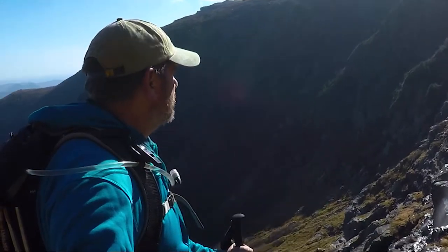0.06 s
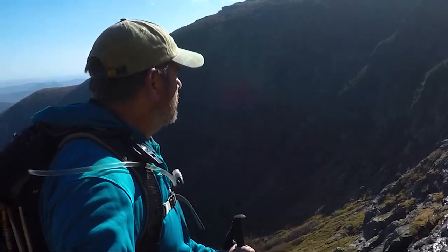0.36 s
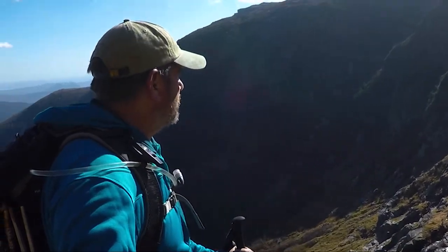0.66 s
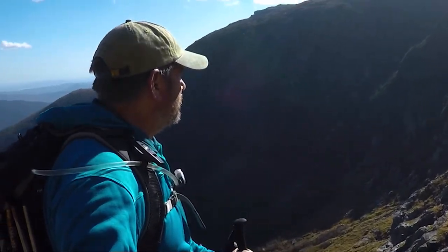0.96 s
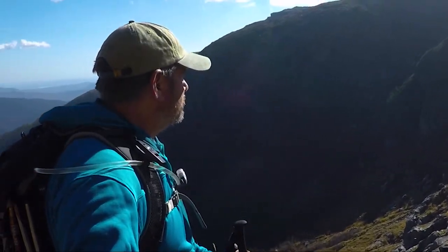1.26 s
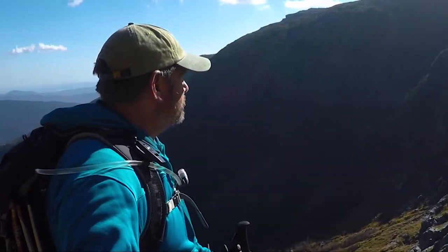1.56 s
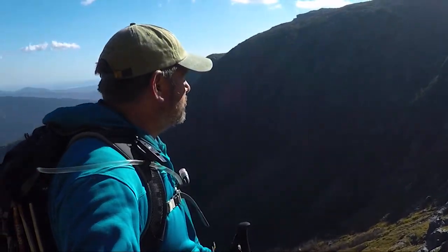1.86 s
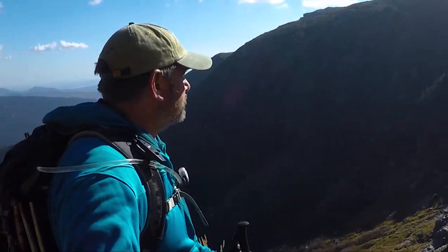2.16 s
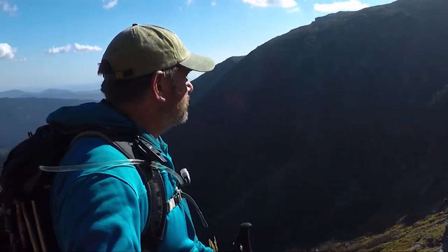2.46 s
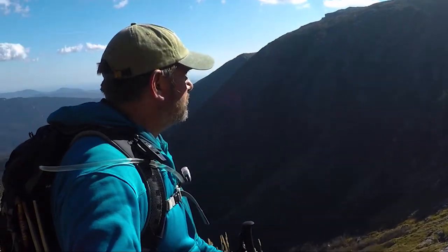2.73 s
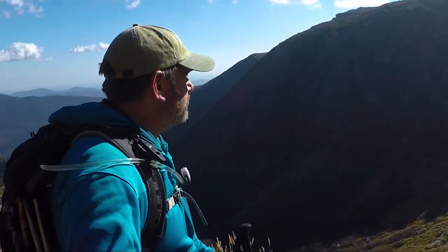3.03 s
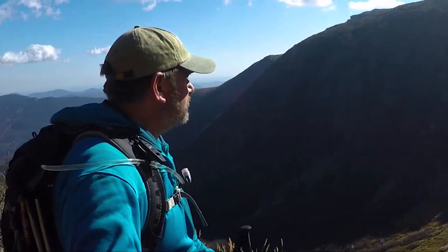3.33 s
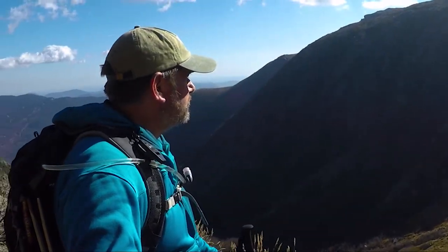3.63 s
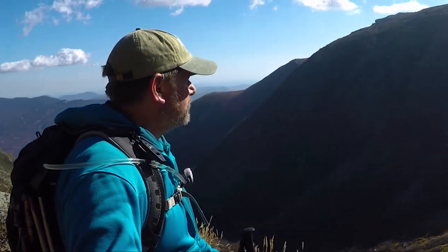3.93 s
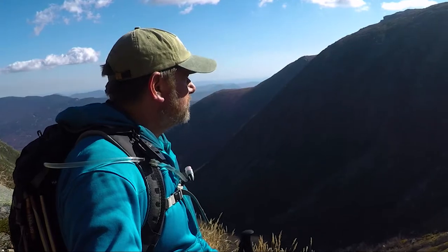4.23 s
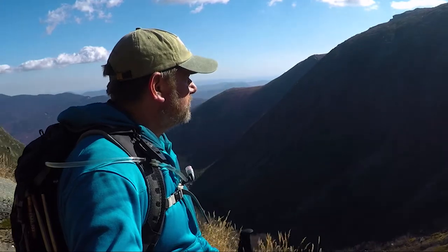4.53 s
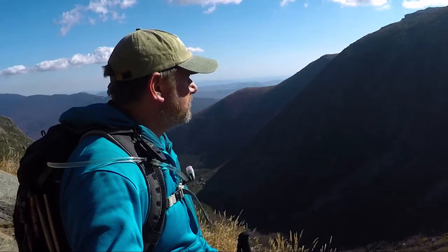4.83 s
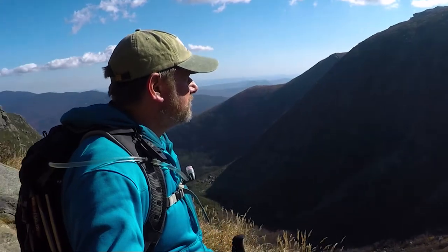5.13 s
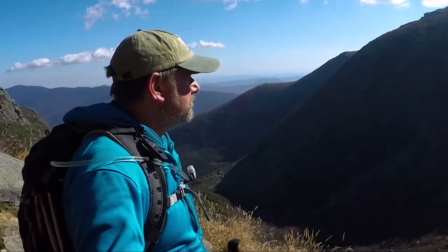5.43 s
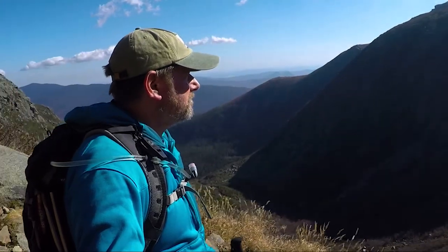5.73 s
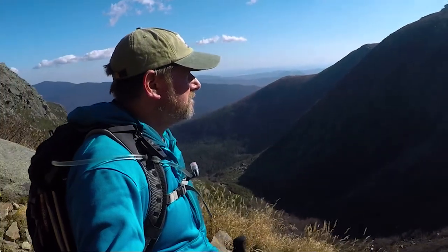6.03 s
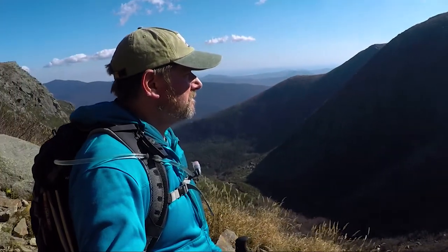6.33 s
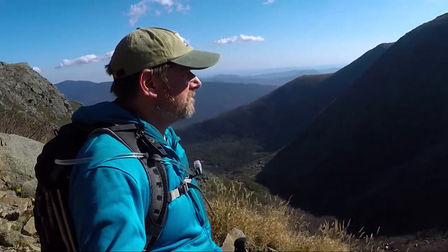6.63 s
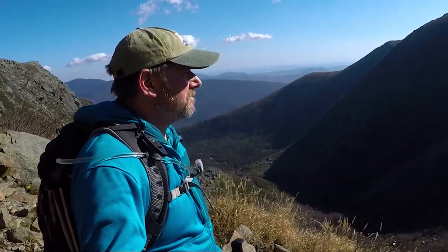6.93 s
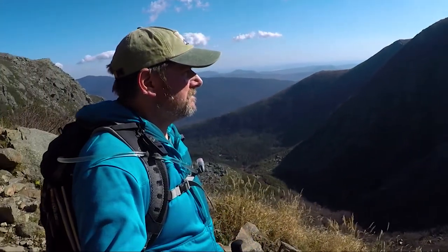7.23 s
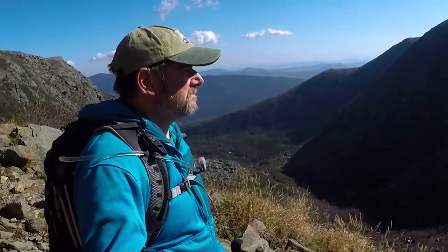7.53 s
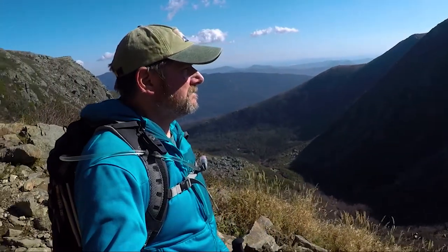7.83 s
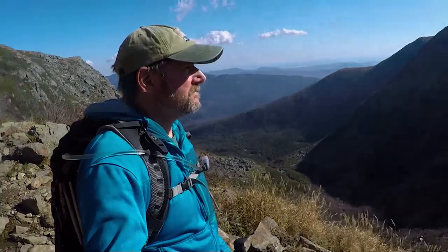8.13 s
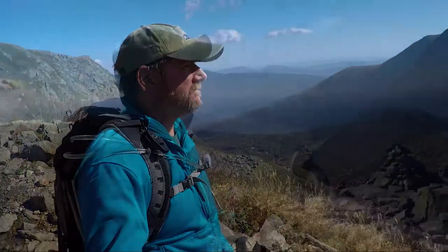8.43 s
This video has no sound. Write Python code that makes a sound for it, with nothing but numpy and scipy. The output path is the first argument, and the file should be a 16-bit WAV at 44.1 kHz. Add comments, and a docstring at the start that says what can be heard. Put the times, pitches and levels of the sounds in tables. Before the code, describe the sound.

Deep, uneven wind rumble buffets the microphone outdoors on a mountainside, each gust swelling fast and dying away, some with a dull thump. A quiet, continuous trickle of water runs underneath, along with a few light taps and the thin hiss of dry grass. After a lull just past the middle, the gusts return, and the grass rustles once as its stalks click together.

```python
"""You hear gusts of wind rumbling and fluttering on an open mountain slope.
Each gust swells fast, holds and dies away as swirls of air (eddies) push on the microphone.
Behind it is the steady wash of running water, with small bubbles gurgling near by.
Dry grass hisses in the breeze and rustles up once; its stalks tick against each other,
and there are a few soft dry taps."""
import sys
import numpy as np
from scipy import signal
from scipy.fft import rfft, irfft, next_fast_len
from scipy.io import wavfile
from scipy.ndimage import uniform_filter1d

SR = 44100
rng = np.random.default_rng(int(sys.argv[2]) if len(sys.argv) > 2 else 0)


def store_wav(level_fs):
    """Save 16-bit WAV to argv[1]."""
    pcm = np.round(np.clip(np.atleast_2d(level_fs), -1, 1) * 32767)
    wavfile.write(sys.argv[1], SR, pcm.T.astype(np.int16))


N = 378283
TIME = np.arange(N) / SR

# how strongly the breeze stirs the grass: (time [s], stirring [dB])
GRASS_STIRRING = [(0.0, -46), (2.2, -48.5), (3.1, -46.5), (5.15, -45), (5.35, -47.5), (6.2, -46.5),
                  (6.58, -45), (6.72, -42.5), (7.02, -46), (8.58, -48.5)]
CALM_GRASS_DB = -47  # the stirring in a light breeze


def amp(db):
    """Turns decibels into a number to multiply a sound by."""
    return 10 ** (np.asarray(db) / 20)


def unit_level(x):
    """Scales a signal so that its average level (rms) is one."""
    return x / np.sqrt(np.mean(x ** 2) + 1e-20)


def follow(curve):
    """Joins (time, value) points with straight lines, giving a value for every sample."""
    times, values = np.transpose(curve)
    return np.interp(TIME, times, values)


def colour(x, spectrum):
    """Shapes the bass and treble by (frequency, level) points; the result has a level of one."""
    size = next_fast_len(N)
    points_hz, points_db = np.transpose(spectrum)
    hz = np.fft.rfftfreq(size, 1 / SR)
    gain = amp(np.interp(np.log(hz + 1), np.log(points_hz), points_db))
    return unit_level(irfft(rfft(x, size) * gain, size)[:N])


def wander(per_s):
    """A random curve of level one that heads for a new value per_s times a second."""
    return unit_level(np.interp(TIME * per_s, np.arange(N), rng.standard_normal(N)))


def add(mix, start_s, sound):
    """Adds a sound into the mix at the given time."""
    part = mix[max(round(start_s * SR), 0):][:len(sound)]
    part += sound[:len(part)]


def bubble(hz, rise_s, glide):
    """A bubble swells into its ring and dies; its pitch creeps up as it nears the surface."""
    age = np.arange(int(9 * rise_s * SR)) / (rise_s * SR)  # counted in rise times
    pitch = hz * (1 + glide * (age - 2))
    return age * np.exp(1 - age) * np.sin(2 * np.pi * np.cumsum(pitch) / SR)


def gurgle(centre_hz, octaves, peak_db, spread_db, rise_s, count):
    """Many small bubbles ring at random moments, their pitches spread around a centre."""
    out = np.zeros(N)
    for when, pitch, faintness, length in rng.random((count, 4)):
        hz = centre_hz * 2 ** (octaves * (pitch - .5))
        gain = amp(peak_db - spread_db * np.sqrt(faintness))
        add(out, when * N / SR, gain * bubble(hz, rise_s * (.5 + length), glide=.01))
    return out


def water():
    """A far wash, a hollow gurgling around one pitch, scattered small bubbles and a few near ones."""
    # the tone of running water: (frequency [Hz], relative level [dB])
    wash_spectrum = [(40, -1.5), (150, 5.5), (300, 0.5), (480, -1), (750, -1), (1100, -.5), (1500, -1.5),
                     (2100, -1.5), (3400, -1.3), (5000, -3.5), (7600, -5), (10000, -11), (12500, -16),
                     (15500, -20.5)]
    # the nearest bubbles: (time [s], pitch [Hz], peak level [dB], rise time [s])
    near_bubbles = [(0.119, 1162, -41, .004), (0.131, 750, -37, 0.0028), (0.763, 1260, -40, .004),
                    (0.873, 1141, -37, .004), (0.926, 1480, -35.2, 0.0018), (1.695, 1137, -34, .003),
                    (1.775, 1030, -42, .003), (2.015, 1090, -42, .004), (2.235, 707, -31, 0.00078),
                    (2.577, 1037, -40, .004), (2.906, 1096, -40, .003), (4.102, 1316, -33.5, .0013),
                    (4.465, 1320, -31.5, .0015), (4.529, 1023, -42, 0.0035), (4.702, 1407, -37.5, .003),
                    (5.867, 1060, -38, .002), (5.911, 1600, -34, .001), (6.054, 1000, -37.5, .004),
                    (8.04, 1130, -38, .002), (8.067, 1140, -37, .002), (8.123, 1033, -35.7, .002),
                    (8.203, 978, -34, .002), (8.219, 1030, -37, .003), (8.393, 980, -35.5, 0.0019)]
    wavering_noise = rng.standard_normal(N) * amp(0.91 * wander(per_s=90))
    out = amp(-42.0) * colour(wavering_noise, wash_spectrum)
    out += gurgle(centre_hz=1082, octaves=0.32, peak_db=-42.5, spread_db=9.5, rise_s=0.0031, count=170)
    out += gurgle(centre_hz=1990, octaves=2.11, peak_db=-34, spread_db=12, rise_s=0.00079, count=420)
    for start_s, hz, db, rise_s in near_bubbles:
        add(out, start_s, amp(db) * bubble(hz, rise_s, glide=0.0096))
    return out


def grass(snaps_per_s=450, size_spread_db=5.0):
    """Stirred grass hisses and gives tiny snaps; the hiss levels off while the snaps keep growing."""
    # the tone of dry grass: (frequency [Hz], relative level [dB])
    straw_spectrum = [(500, -10), (2000, 3.5), (3500, 5), (6000, 5), (8000, 4), (10000, -1.5), (12500, -18),
                      (15500, -23)]
    stir_db = follow(GRASS_STIRRING) - CALM_GRASS_DB + 0.39 * wander(per_s=14)
    hiss_db = CALM_GRASS_DB - 11.0 + 3.0 * np.minimum(stir_db, 3)
    snaps_db = CALM_GRASS_DB - 6.0 + 3.0 * stir_db
    hiss = colour(rng.standard_normal(N), straw_spectrum)
    sizes = amp(size_spread_db * np.minimum(rng.exponential(1, N), 3.5)) * rng.choice([-1, 1], N)
    snapping = rng.random(N) < snaps_per_s / SR
    snaps = colour(sizes * snapping, straw_spectrum)
    return hiss * amp(hiss_db) + snaps * amp(snaps_db)


def tick(hz, rise_cycles=0.46, tail_db=-16, tail_s=0.0014):
    """A stalk snaps in a swing or two, then shivers briefly."""
    t = np.arange(SR // 60) / SR
    age = t * hz / rise_cycles
    snap = age * np.exp(1 - age) * np.sin(2 * np.pi * hz * t)
    fading_noise = rng.standard_normal(len(t)) * np.exp(-t / tail_s)
    shiver = np.convolve(fading_noise, snap)[:len(t)] / np.linalg.norm(snap)
    return snap + amp(tail_db) * shiver


def stalks(far_db=-26, spread_db=5, centre_hz=5300, octaves=1.9, count=60):
    """Stalks knock together: sharp ticks close by, and faint ones that crowd when the grass stirs."""
    # the sharpest ticks: (time [s], pitch [Hz], level [dB])
    near_ticks = [(0.3362, 3090, -28), (1.41, 7720, -13), (1.4332, 4780, -22), (2.0374, 4710, -22),
                  (2.3718, 7590, -22), (3.1203, 4800, -27), (5.468, 5630, -19.5), (5.773, 7750, -20.5),
                  (5.8771, 6300, -21.5), (6.0363, 4120, -20.5), (6.416, 6310, -19.5), (6.6692, 7460, -18),
                  (6.6986, 6280, -26), (6.7682, 4930, -20.5), (6.7865, 4780, -22), (6.8266, 7000, -17),
                  (7.4284, 5670, -21), (7.674, 3750, -20.5), (7.9464, 4000, -18)]
    out = np.zeros(N)
    for start_s, hz, db in near_ticks:
        add(out, start_s, amp(db) * tick(hz))
    stirring_so_far = np.cumsum(amp(2.5 * (follow(GRASS_STIRRING) - CALM_GRASS_DB)))
    for when, pitch, faintness in rng.random((count, 3)):
        start_s = np.interp(when, stirring_so_far / stirring_so_far[-1], TIME)
        hz = centre_hz * 2 ** (octaves * (pitch - .5))
        add(out, start_s, amp(far_db - spread_db * faintness) * tick(hz, tail_db=-11))
    return out


def taps(scuff_s=0.0038, ring_s=0.0013):
    """Each tap is a brief scuff that sets off a ring, which dies almost at once."""
    # soft dry taps: (time [s], pitch [Hz], peak level [dB])
    dry_taps = [(0.196, 1290, -33.5), (0.335, 2050, -29), (0.540, 2000, -26.5), (0.716, 2130, -31),
                (3.053, 2184, -32.5), (4.19, 1867, -32), (4.532, 2110, -27), (5.209, 2065, -35)]
    out = np.zeros(N)
    t = np.arange(SR // 25) / SR
    for start_s, hz, db in dry_taps:
        scuff = rng.standard_normal(len(t)) * np.exp(-t / scuff_s)
        ring = np.exp(-t / ring_s) * np.sin(2 * np.pi * hz * t)
        tap = np.convolve(scuff, ring)[:len(t)]
        add(out, start_s, amp(db) * tap / abs(tap).max())
    return out


def thumps():
    """A single eddy passes the microphone: a pull between two smaller pushes."""
    # single strong eddies: (time [s], centre frequency [Hz], peak level [dB])
    strong_eddies = [(0.535, 55.6, -6), (0.615, 42, -6), (0.78, 44, -7.5), (1.738, 52, -8),
                     (1.84, 68, -11.5), (3.46, 91, -17), (3.589, 42, -7), (6.077, 59.6, -10.5)]
    out = np.zeros(N)
    for middle_s, hz, db in strong_eddies:
        away = (np.pi * hz * (TIME - middle_s)) ** 2
        out += amp(db) * (2 * away - 1) * np.exp(-np.minimum(away, 50))
    return out


def eddies(spectrum, steady_s):
    """Swirling air makes random pressure swings, kept even in strength over spans beyond steady_s."""
    pressure = colour(rng.standard_normal(N), spectrum)
    span = max(int(steady_s * SR), 1)
    power = uniform_filter1d(uniform_filter1d(pressure ** 2, span), span)
    return unit_level(pressure / np.sqrt(abs(power) + 1e-6))


def gusting(starts_s, holds_s, levels_db, breeze_db, fade_s, rise_s=0.033, creep_db_per_s=0.5):
    """The wind's strength: over a light breeze, each gust swells, creeps up as it holds, then fades."""
    power = np.full(N, amp(breeze_db) ** 2)
    for start_s, hold_s, db in zip(starts_s, holds_s, levels_db):
        age = np.maximum(TIME - start_s, 0)
        swell = np.minimum(age / rise_s, 1)
        fade = np.exp(-np.maximum(age - hold_s, 0) / fade_s)
        power += (swell * fade * amp(db + creep_db_per_s * age)) ** 2
    return np.sqrt(power)


def wind():
    """Large eddies rock the microphone with a rumble; small ones flutter in bursts and die first."""
    # gusts of wind: (start [s], time until fading [s], rumble level [dB], flutter level [dB])
    gusts = [(0.0, .24, -15.5, -21), (0.3, .17, -25, -27), (0.474, 0.2, -11.5, -22.5),
             (0.738, 0.43, -14.5, -28.5), (1.235, 0.27, -16.5, -32), (1.543, 0.23, -13.5, -22.5),
             (1.852, 0.13, -17, -30), (2.098, 0.3, -22.5, -45), (2.738, .08, -23, -42),
             (3.116, 0.047, -26, -59), (3.427, 0.23, -13.5, -31.5), (3.712, 0.11, -15, -32),
             (3.917, 0.17, -23, -50), (4.137, 0.16, -21, -45), (4.432, 0.27, -16.5, -33.5),
             (4.862, 0.42, -29, -57), (5.567, 0.28, -25, -33.5), (5.832, 0.24, -15.5, -30),
             (6.17, 0.37, -23.5, -34), (6.595, 0.23, -20, -30), (6.906, 0.072, -19.5, -35),
             (7.042, 0.17, -15.5, -28.5), (7.256, 0.52, -22, -34), (7.607, 0.4, -17, -35.5),
             (8.076, .48, -22.5, -37)]
    # the tone of large, slow eddies: (frequency [Hz], relative level [dB])
    rumble_spectrum = [(4, -3), (10, 4), (20, 1), (30, 4), (42, -6.5), (55, -9), (75, -27.5), (130, -50),
                       (300, -86)]
    # the tone of small, fast eddies: (frequency [Hz], relative level [dB])
    flutter_spectrum = [(25, -7), (48, 1), (65, 5), (110, -8.5), (160, -18.5), (250, -28.5), (450, -38.5),
                        (1000, -54), (3000, -88)]
    starts_s, holds_s, rumble_db, flutter_db = np.transpose(gusts)
    rumble = eddies(rumble_spectrum, steady_s=0.056)
    rumble *= gusting(starts_s, holds_s, rumble_db, breeze_db=-38, fade_s=.07)
    bursts = unit_level(amp(2.0 * wander(per_s=45)))
    flutter = eddies(flutter_spectrum, steady_s=0.037)
    flutter *= gusting(starts_s, holds_s, flutter_db, breeze_db=-56, fade_s=.04)
    wobble = unit_level(amp(1.7 * wander(per_s=18)))
    return rumble * wobble + flutter * bursts


def scene():
    """Everything meets at one microphone, in open air with no echo."""
    return (wind() + thumps() + water() + grass() + stalks() + taps())[None]


def record(dry, cutoff_hz=15400):
    """The recorder cuts off the very highest treble."""
    low_pass = signal.firwin(511, cutoff_hz, window=("kaiser", 9), fs=SR)
    return signal.oaconvolve(dry, low_pass[None], "same")


dry = scene()
out = record(dry)
store_wav(out)
```